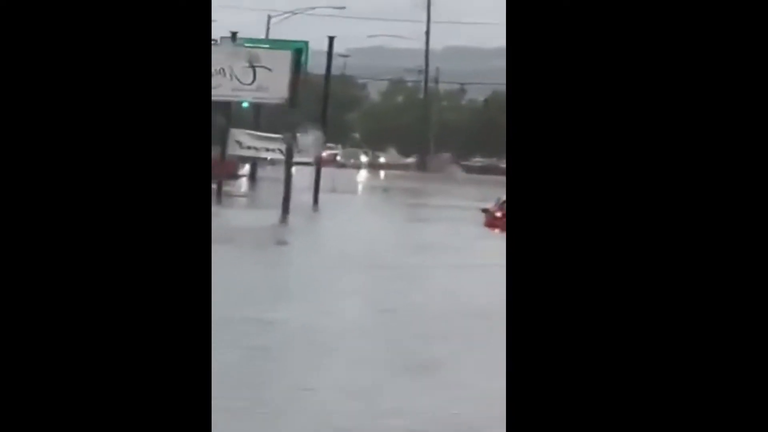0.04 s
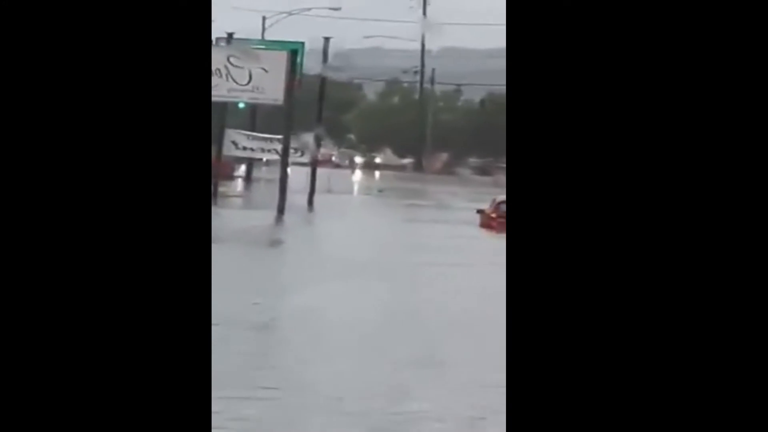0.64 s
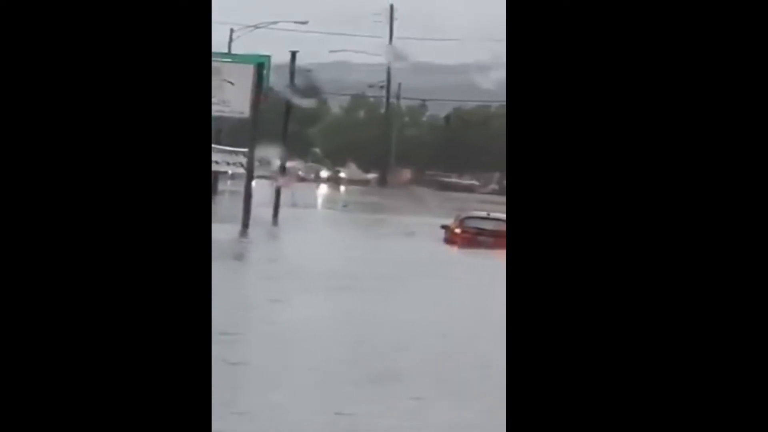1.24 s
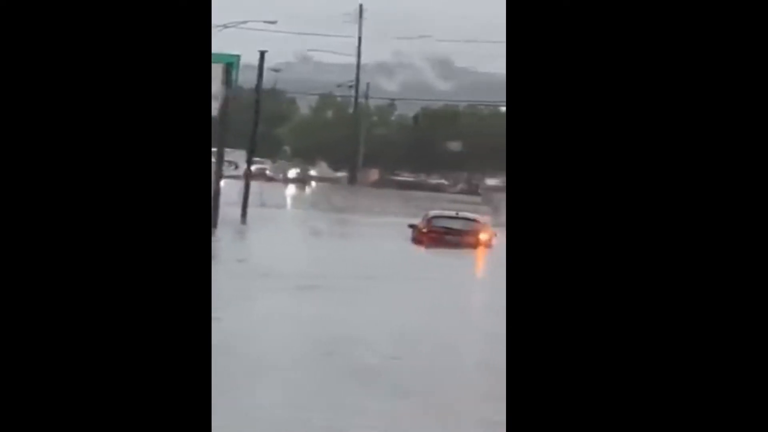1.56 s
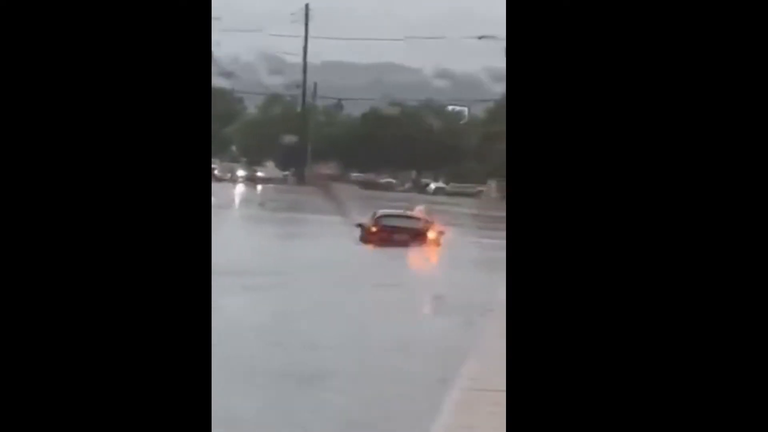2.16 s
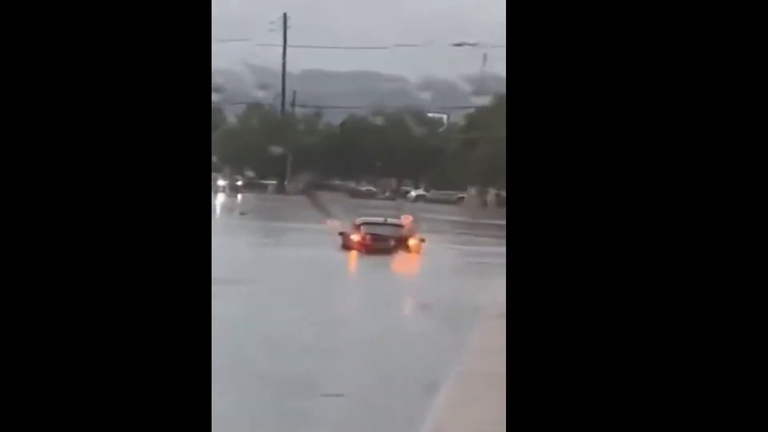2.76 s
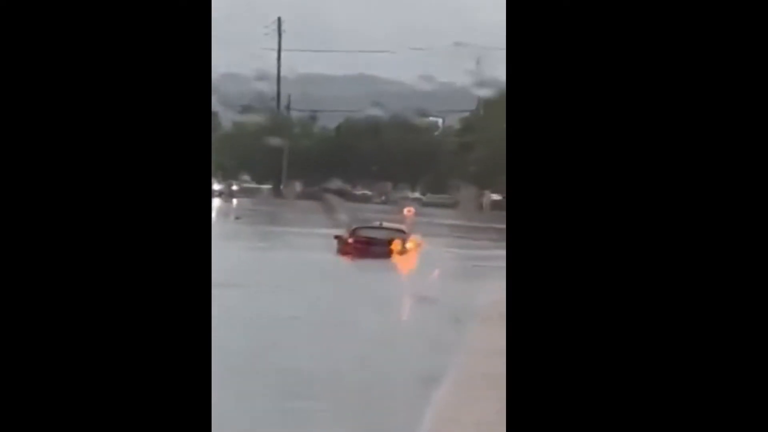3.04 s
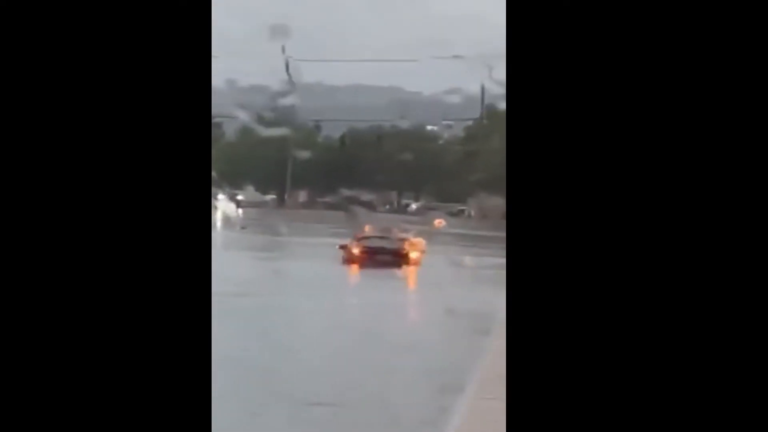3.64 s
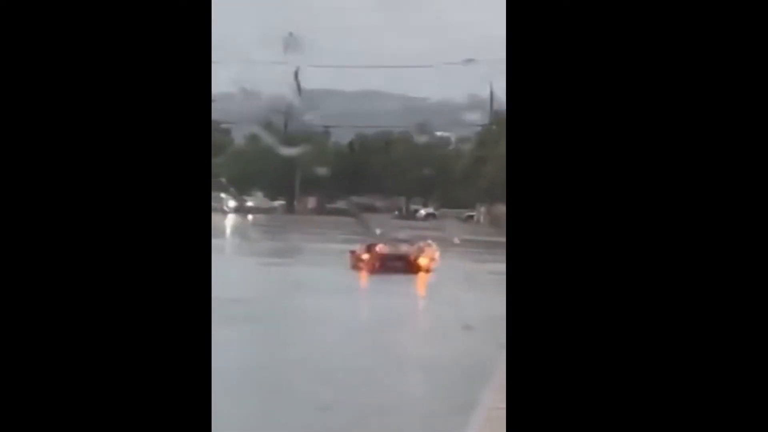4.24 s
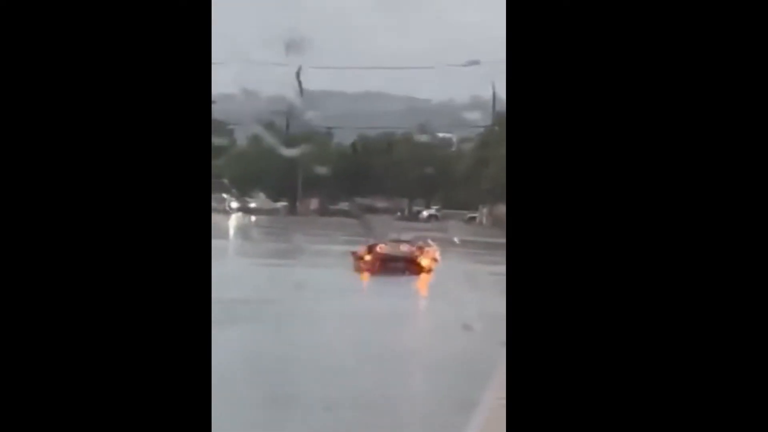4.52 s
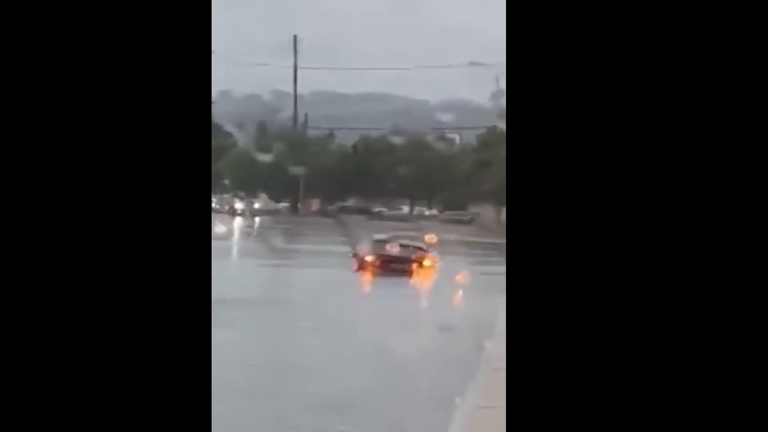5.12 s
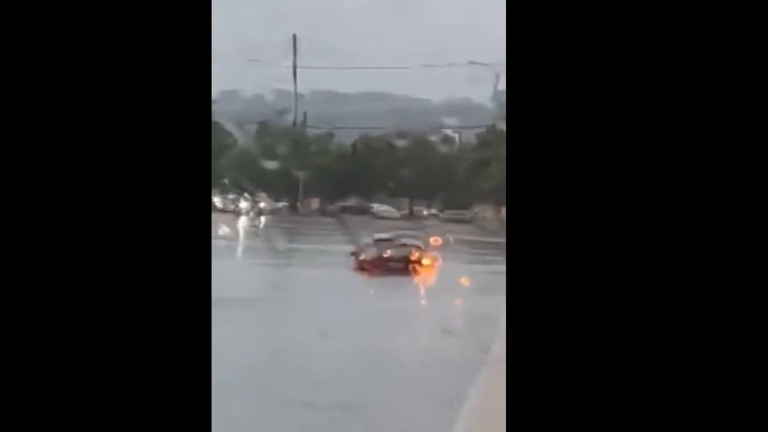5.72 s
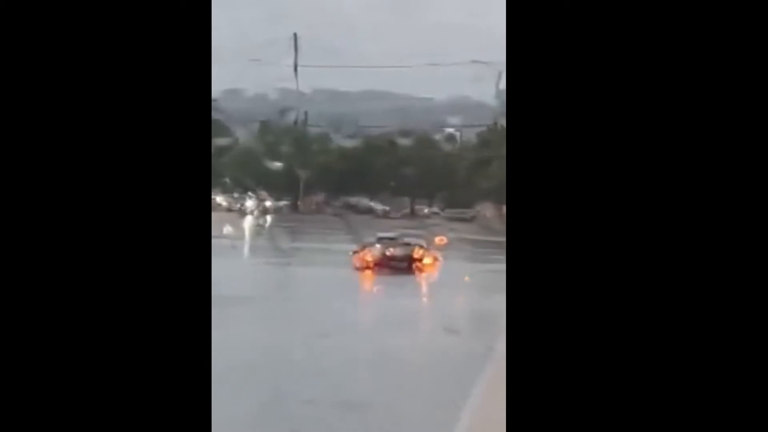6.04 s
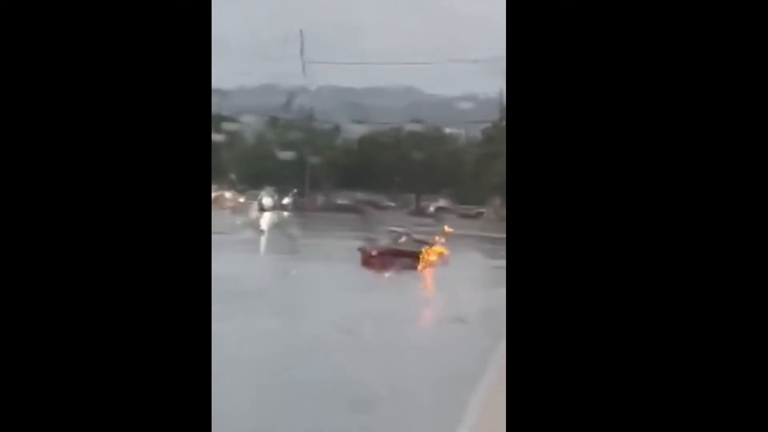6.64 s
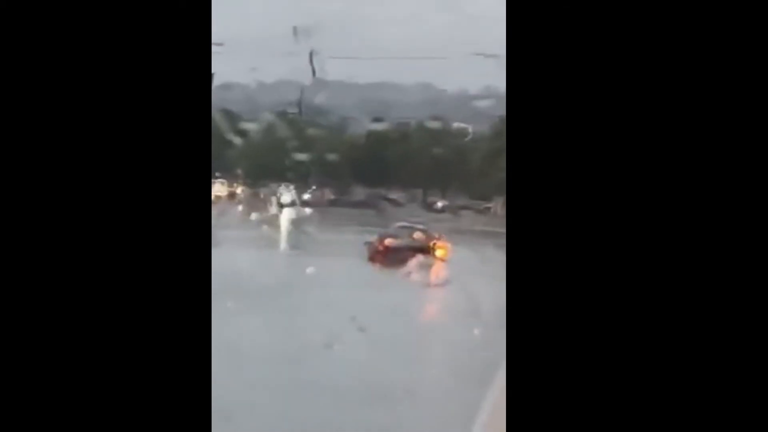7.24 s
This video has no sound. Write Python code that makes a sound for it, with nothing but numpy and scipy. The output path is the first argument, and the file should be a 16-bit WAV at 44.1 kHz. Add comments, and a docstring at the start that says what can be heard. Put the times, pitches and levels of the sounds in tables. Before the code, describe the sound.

Heavy rain and a few fat drips tap on an idling car, with a deep cabin rumble and brief handling bumps.

```python
"""Heavy rain patters on the roof and glass of a car that stands in a flooded street.
Each impact sets a panel ringing, and a few fat drips knock out above the rest. Behind them, rain on
the water outside merges into a dull wash, the idling engine drones and the cabin air booms at its
modes. A hand shifts on the phone that holds the microphone: two soft bumps, clicks and a rustle."""
import sys
import numpy as np
from scipy import signal
from scipy.fft import rfft, irfft
from scipy.io import wavfile
from scipy.ndimage import uniform_filter1d

SR = 44100
rng = np.random.default_rng(int(sys.argv[2]) if len(sys.argv) > 2 else 0)


def put_to_file(sound):
    """Save the sound as 16-bit audio at rate SR, in the file named by the first command-line argument."""
    columns = np.atleast_2d(sound).T  # one column per channel
    safe = np.clip(columns, -1, 1)
    whole_steps = np.round(safe * 32767)
    wavfile.write(sys.argv[1], SR, whole_steps.astype(np.int16))


N = 321048
TIME = np.arange(N) / SR

# The wash behind closed windows. Each row: frequency in Hz, relative spectral density in dB.
WASH_SPECTRUM = [(20, -15.5), (100, 9), (220, 0.5), (330, -1.5), (500, -1.5), (780, -12.5), (1150, -13),
                 (1700, -21), (3000, -22.5), (4500, -32), (6500, -42.5), (7800, -65.5)]
# Air modes of the cabin. Each row: frequency in Hz, bandwidth in Hz, relative level in dB.
CABIN_MODES = [(27, 8.4, -18), (39, 6.7, -8), (55.4, 13, 1), (74.36, 12.8, 0.5), (91.2, 11, -7),
               (114.5, 15, -5.5), (131.6, 12, -7), (178.3, 38, -7), (226.3, 26, -16)]
# Swells of the boom. Each row: time of the crest in seconds, lift in dB.
BOOM_SWELLS = [(.76, 3), (1.28, 5), (5.35, 2)]
# Pitch of the idling engine. Each row: time in seconds, firing frequency in Hz.
FIRING_PITCH = [(0, 56.12), (3.1, 55.01), (3.9, 52.82), (4.4, 53.43), (4.7, 55.4), (7.28, 55.05)]
# The drone comes up as the idle sags, then nearly dies. Each row: time in seconds, rms level in dB.
DRONE_LEVEL = [(0, -31.5), (1.7, -39), (2.4, -36.5), (2.85, -32.5), (3.3, -36), (3.8, -34.5), (4.05, -30),
               (4.5, -28.5), (4.85, -40), (7.28, -46.5)]
# Bumps of the hand. Each row: time in seconds, impulse in dB, contact time in seconds, shudder in dB.
HAND_BUMPS = [(1.88, -14, 0.0038, -34), (1.897, -27, .003, -31), (1.911, -21.5, 0.0041, -40),
              (1.949, -26, 0.0036, -35), (2.246, -14, 0.0075, -43), (2.257, -38, .003, -32),
              (2.3027, -24.5, 0.0028, -32), (2.449, -15.5, 0.016, -49), (2.506, -27, 0.0067, -39)]
# Low modes of the held phone. Each row: frequency in Hz, relative level in dB, T60 in seconds.
PHONE_MODES = [(54, -8, 0.44), (75, -0.5, 0.59), (109.4, 6.5, 0.14), (124.3, 6, 0.12), (189, -7, 0.13),
               (274, -7, 0.11)]
# Finger strokes on the case. Each row: midpoint in seconds, crest level in dB, half length in seconds.
FINGER_STROKES = [(1.742, -63, 0.077), (1.895, -51.5, 0.012), (1.964, -60, 0.051), (2.085, -54, 0.036),
                  (2.17, -57, 0.032), (2.219, -55, 0.028), (2.254, -49.5, 0.014), (2.318, -56, 0.037),
                  (2.415, -62, .05)]
# Friction of skin on the case. Each row: frequency in Hz, relative spectral density in dB.
FRICTION_SPECTRUM = [(1500, -18), (2700, -3), (3400, -2), (4300, -3), (5600, -1.5), (7200, -6), (8200, -29),
                     (9400, -19.5)]
# Clicks as the grip changes. Each row: start in seconds, gain in dB, favoured frequency in Hz.
GRIP_CLICKS = [(1.887, -50, 5500), (1.899, -49, 6000), (2.252, -39, 4800), (2.2578, -38.5, 3300),
               (2.2682, -40.5, 5400), (2.321, -43, 2000)]
# Modes of the phone case. Each row: frequency in Hz, relative level in dB, T60 in seconds.
CASE_MODES = [(3350, 0.5, 0.064), (4400, -6, 0.017), (5380, -5.5, 0.065), (5630, -12, .04),
              (6040, -10, .025), (7550, -10, .02)]
# Fat drips on the panels. Each row: start in seconds, peak of the knock in dB, pitch in Hz,
# bandwidth as a fraction of the pitch, splash level in dB relative to the knock.
FAT_DRIPS = [(.7972, -41, 790, .6, -20), (0.9174, -39, 2200, 0.37, -20), (1.2013, -25.5, 757, 0.37, -31),
             (1.2105, -35, 850, .35, -27), (1.218, -36, 755, .22, -25), (2.7807, -40, 1200, .4, -6),
             (2.812, -40, 900, .6, -12), (2.9493, -39, 600, .6, -17), (3.147, -37.5, 736, 0.52, -14),
             (3.3234, -32, 517, .6, -17), (3.377, -37, 425, 0.55, -24), (3.6188, -42, 604, .6, -12),
             (3.9371, -37, 600, .6, -20), (4.1428, -35, 1102, 0.34, -14), (4.778, -43, 2300, .6, -4),
             (4.7833, -35, 2090, 0.45, -11), (4.795, -36, 1690, 0.6, -10), (4.97, -42, 420, 0.54, -19),
             (5.3415, -22.5, 450, 0.5, -25), (5.343, -32, 844, 0.71, -20), (5.349, -33, 1300, .4, -22),
             (5.356, -34, 1130, .5, -19), (6.1535, -36, 550, .6, -22), (6.3181, -39, 650, .6, -20),
             (6.3448, -37, 1100, 0.3, -18), (7.1298, -36, 2180, 0.31, -22)]
# Two hollow notes of the panels. Each row: frequency in Hz, bandwidth in Hz.
HOLLOW_NOTES = [(1110, 190), (2180, 200)]
# Their strength as the rain shifts. Each row: time in seconds, low note's lift in dB, high note's in dB.
HOLLOW_LIFTS = [(0, -1, -2), (.65, 3, -0.5), (1.45, -1.5, -1.5), (2.3, 0, 1.5), (3.3, -2.5, 1.5),
                (4.3, 1.5, 0.5), (4.8, 1, 0.5), (5.25, 0, 3.5), (5.8, -1.2, -1.5), (6.4, 1.3, 3),
                (7.28, -0.5, -0.5)]
# Broad colour of the patter. Each row: frequency in Hz, relative spectral density in dB.
PATTER_SPECTRUM = [(120, -11), (300, 3), (520, 1.5), (780, 1.5), (1200, -5.5), (1550, -5), (2400, -10),
                   (3000, -14.5), (3700, -18.5), (4800, -21.5), (6400, -25), (7200, -32), (7900, -51.5)]
# Resonances and dead notes of roof and glass. Each row: frequency in Hz, bandwidth in Hz, lift in dB.
PANEL_RESONANCES = [(301.3, 16, 13.5), (398, 55, 6), (565, 18, 5), (753, 19, -11.5), (802, 23, 3.5),
                    (900, 25, -2), (1015, 57, 6.5), (1098.6, 46, 11), (1102, 16, -4.5), (1241, 51, 8),
                    (1481, 31, 5), (1616, 19, 6.5), (2180, 87, 6.5), (2796, 78, 5.5), (2990, 49, 6.5)]
# Strength of the shower. Each row: time in seconds, base level of the patter in dB.
RAIN_LEVEL = [(0, -45.5), (1.1, -45.5), (1.4, -47), (2.0, -46), (2.66, -44.5), (2.83, -42.5), (3.0, -45),
              (3.4, -45), (3.85, -46.5), (4.15, -45), (4.46, -47.5), (4.6, -44), (5.35, -44), (5.55, -45),
              (5.85, -46), (6.3, -45), (7.28, -45)]


def from_db(db):
    """Amplitude grows tenfold for every 20 dB."""
    return 10 ** (np.asarray(db) / 20)


def unit_rms(x):
    """Normalisation to an rms of 1."""
    return x / np.sqrt(np.mean(x ** 2) + 1e-20)


def in_time(rows):
    """Linear interpolation of each column of a timed table at every sample."""
    seconds, *columns = np.transpose(rows)
    return [np.interp(TIME, seconds, column) for column in columns]


def drift(rate_hz):
    """Random modulation of rms 1, lying mostly below rate_hz."""
    knots = rng.standard_normal(4000)
    return unit_rms(np.interp(TIME * 2 * rate_hz, np.arange(len(knots)), knots))


def hump(crest_s, half_s):
    """Gaussian envelope: 1 at the crest, 1/e at half_s to either side."""
    return np.exp(-((TIME - crest_s) / half_s) ** 2)


def decay(t, t60):
    """Exponential decay from t = 0, losing 60 dB in t60 seconds."""
    return (t >= 0) * np.exp(-np.log(1000) * np.maximum(t, 0) / t60)


def resonate(x, hz, width_hz, stages=1):
    """Two-pole resonators in cascade, each with a peak gain of 1."""
    r = np.exp(-np.pi * width_hz / SR)
    feedback = [1, -2 * r * np.cos(2 * np.pi * hz / SR), r * r]
    for _ in range(stages):
        x = signal.lfilter(np.array([1, 0, -1]) * (1 - r * r) / 2, feedback, x + 1e-18)
    return x


def coloured(x, spectrum, peaks=(), size=16384):
    """Minimum-phase filtering by a spectrum and its resonant peaks; the result has rms 1."""
    f = np.maximum(np.fft.rfftfreq(size, 1 / SR), 1)
    hz, db = np.transpose(spectrum)
    curve_db = np.interp(np.log(f), np.log(hz), db)
    for centre, width, lift in peaks:
        curve_db += lift / (1 + (2 * (f - centre) / width) ** 2)
    cepstrum = irfft(np.log(from_db(curve_db)))[:size // 2]
    cepstrum[0] /= 2
    response = irfft(np.exp(rfft(2 * cepstrum, size)))
    return unit_rms(signal.fftconvolve(x, response)[:N])


def water_wash(level_db=-39, surge_db=1.03):
    """Incoherent summation: countless far drops on the floodwater merge into a muffled, surging rush."""
    return from_db(level_db + surge_db * drift(3.6)) * coloured(rng.standard_normal(N), WASH_SPECTRUM)


def cabin_boom(base_db=-31.5, swell_half_s=0.11):
    """Cavity resonance: engine and moving water shake the body, and the cabin air booms at its modes."""
    level_db = base_db + sum(lift_db * hump(s, swell_half_s) for s, lift_db in BOOM_SWELLS)
    boom = 0
    for hz, width_hz, db in CABIN_MODES:
        boom += from_db(db) * unit_rms(resonate(rng.standard_normal(N), hz, width_hz, stages=2))
    # the shaking is steady, so the boom keeps a fairly even strength
    envelope = np.sqrt(uniform_filter1d(boom ** 2, size=6000) + 1e-12)
    return from_db(level_db) * unit_rms(boom / envelope)


def engine_drone(waver_db=1.0, octave_db=-11):
    """Periodic excitation: the firing of the engine gives a note and its octave, which swell and fade."""
    hz, = in_time(FIRING_PITCH)
    level_db, = in_time(DRONE_LEVEL)
    phase = 2 * np.pi * np.cumsum(hz) / SR
    tone = unit_rms(np.sin(phase) + from_db(octave_db) * np.sin(2 * phase))
    return from_db(level_db + waver_db * drift(5)) * tone


def hand_bumps(shudder_hz=228, shudder_width_hz=115, shudder_t60=0.078):
    """Soft impact: pushes shake the phone and ring its low modes; longer contact gives a duller thud."""
    force, shaking = np.zeros((2, N))
    for s, db, contact_s, shudder_db in HAND_BUMPS:
        pulse = hump(s, contact_s / 4)
        force += from_db(db) * pulse / pulse.sum()
        shaking += from_db(shudder_db) * decay(TIME - s, shudder_t60)
    response = sum((-1) ** k * from_db(db) * np.sin(2 * np.pi * hz * TIME) * decay(TIME, t60)
                   for k, (hz, db, t60) in enumerate(PHONE_MODES))
    thud = signal.fftconvolve(force, response)[:N]
    noise = rng.standard_normal(N)
    steady_rms = resonate(noise, shudder_hz, shudder_width_hz, stages=2).std()
    shudder = resonate(noise * shaking, shudder_hz, shudder_width_hz, stages=2)
    return thud + shudder / steady_rms


def finger_rustle(grain_db=1.5):
    """Sliding friction: skin on the case makes a grainy hiss with each stroke."""
    strokes = sum(from_db(db) * hump(s, half_s) for s, db, half_s in FINGER_STROKES)
    friction = rng.standard_normal(N) * from_db(grain_db * drift(150))
    return strokes * coloured(friction, FRICTION_SPECTRUM)


def case_clicks(crack_db=-8, crack_t60=0.016, spread_octaves=0.54, size=8192):
    """Modal excitation: each contact cracks and rings the case modes near the frequency it favours."""
    out, t = np.zeros(N + size), TIME[:size]
    for s, db, favoured_hz in GRIP_CLICKS:
        ring = 0
        for hz, mode_db, t60 in CASE_MODES:
            coupling = np.exp(-(np.log2(hz / favoured_hz) / spread_octaves) ** 2)
            ring += from_db(mode_db) * coupling * np.sin(2 * np.pi * hz * t) * decay(t, t60)
        noise = resonate(rng.standard_normal(size), favoured_hz, favoured_hz / 2, stages=2)
        crack = from_db(crack_db) * unit_rms(noise) * decay(t, crack_t60)
        at = round(s * SR)
        out[at:at + size] += from_db(db) * (ring + crack)
    return out[:N]


def fat_drips(tail_t60=0.42, tail_db=-22, splash_t60=0.079, tick_db=9, top_hz=6500, size=8192):
    """Impulse response: a drip knocks on one spot of a panel, splashes and reverberates in the cabin."""
    out, t = np.zeros(N + size), TIME[:size]
    impulse = t == 0
    splash_band = signal.butter(2, [800, 3000], "band", fs=SR, output="sos")
    for s, db, hz, width_fraction, splash_db in FAT_DRIPS:
        echoes, spray = rng.standard_normal((2, size))
        knock, tail = resonate(np.array([impulse, echoes]), hz, width_fraction * hz, stages=2)
        tail = from_db(tail_db) * unit_rms(tail) * decay(t, tail_t60)
        spray += from_db(tick_db) * impulse   # the splash opens with a sharp tick
        splash = from_db(splash_db) * unit_rms(signal.sosfilt(splash_band, spray)) * decay(t, splash_t60)
        at = round(s * SR)
        out[at:at + size] += from_db(db) * (knock / abs(knock).max() + tail + splash)
    # the closed cabin lets no high treble in
    return signal.sosfilt(signal.butter(8, top_hz, fs=SR, output="sos"), out[:N])


def hollow_panels(patter, flicker_db=1.0):
    """Resonant emphasis: two hollow notes of the panels stand out of the patter by turns."""
    out = patter.copy()
    for (hz, width_hz), lift_db in zip(HOLLOW_NOTES, in_time(HOLLOW_LIFTS)):
        gain = from_db(lift_db + flicker_db * drift(11))
        out += (gain - 1) * resonate(patter, hz, width_hz)
    return out


def rain_patter(drops_per_s=850, spread_db=3.0, ring_t60=0.06, tick=2.8, flurry_db=2.0, spots=24):
    """Shot noise: drops of all sizes land at random, and each spot of the car ticks and rings its way."""
    level_db, = in_time(RAIN_LEVEL)
    strength = from_db(spread_db * np.minimum(rng.exponential(1, N), 4.5))
    lands = rng.random(N) < drops_per_s * from_db(level_db - level_db.mean()) / SR   # harder is denser
    spot = rng.integers(0, spots, N)
    impacts, t = np.zeros(N), TIME[:2048]
    for k in range(spots):
        response = rng.standard_normal(len(t)) * decay(t, ring_t60)
        response[0] += tick * (-1) ** k
        impacts += signal.oaconvolve(strength * lands * (spot == k), response)[:N]
    panels = coloured(impacts, PATTER_SPECTRUM, PANEL_RESONANCES)
    # flurries sweep the dull roof and the bright glass at different moments
    roof = signal.sosfilt(signal.butter(1, 1800, fs=SR, output="sos"), panels)
    glass = panels - roof
    swept = roof * from_db(flurry_db * drift(9)) + glass * from_db(flurry_db * drift(9))
    return from_db(level_db) * swept


def scene():
    """Superposition: all sources add at one microphone behind the window."""
    rain = hollow_panels(rain_patter()) + water_wash() + fat_drips()
    car = cabin_boom() + engine_drone()
    handling = hand_bumps() + finger_rustle() + case_clicks()
    return (rain + car + handling)[None]


def record(dry, bottom_hz=22, top_hz=9600):
    """Band limiting: the phone drops the deepest bass and cuts the top steeply."""
    thinned = signal.sosfilt(signal.butter(2, bottom_hz, "high", fs=SR, output="sos"), dry)
    return signal.sosfilt(signal.ellip(10, .1, 80, top_hz, fs=SR, output="sos"), thinned)


dry = scene()
out = record(dry)
put_to_file(out)
```